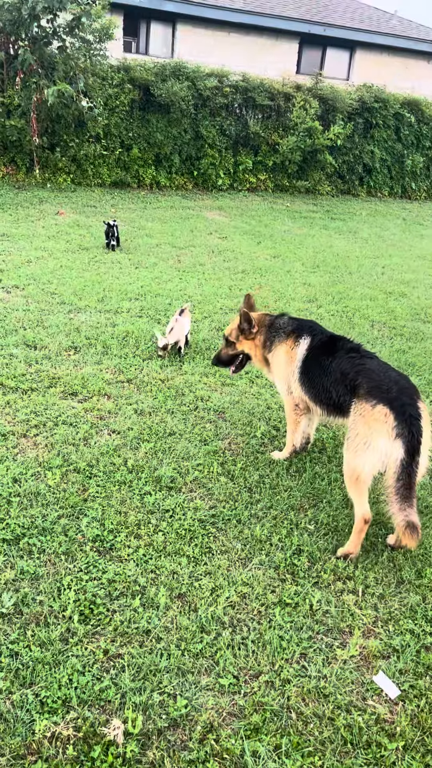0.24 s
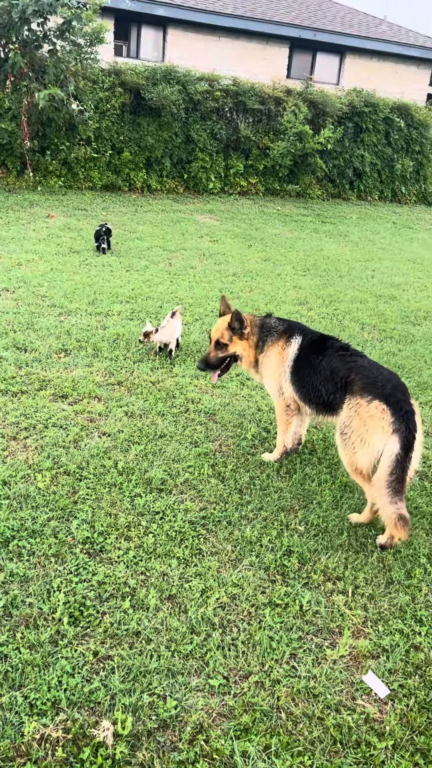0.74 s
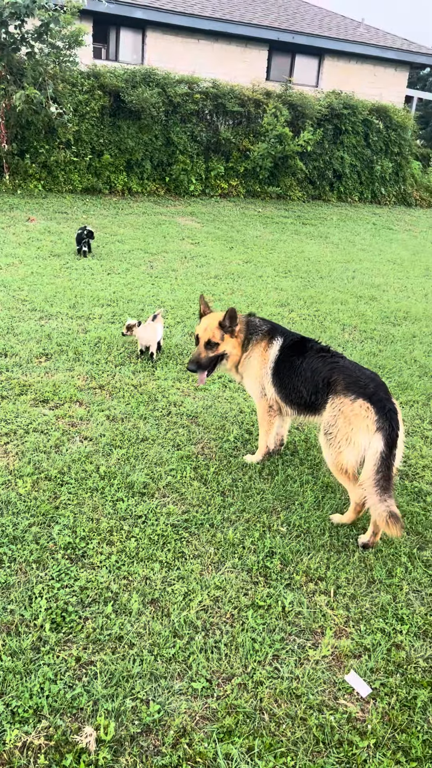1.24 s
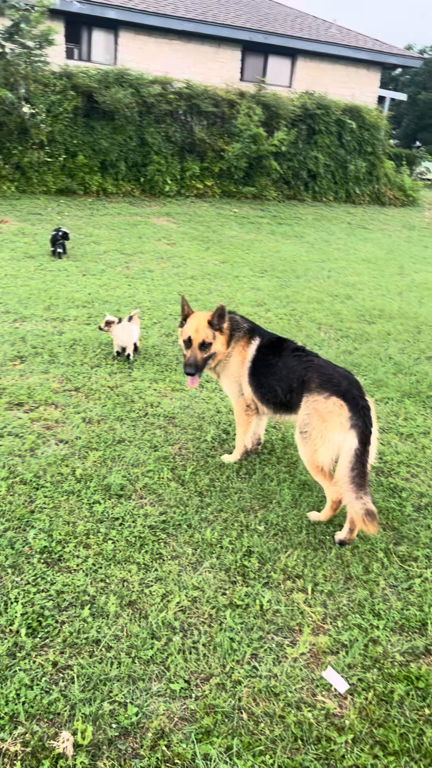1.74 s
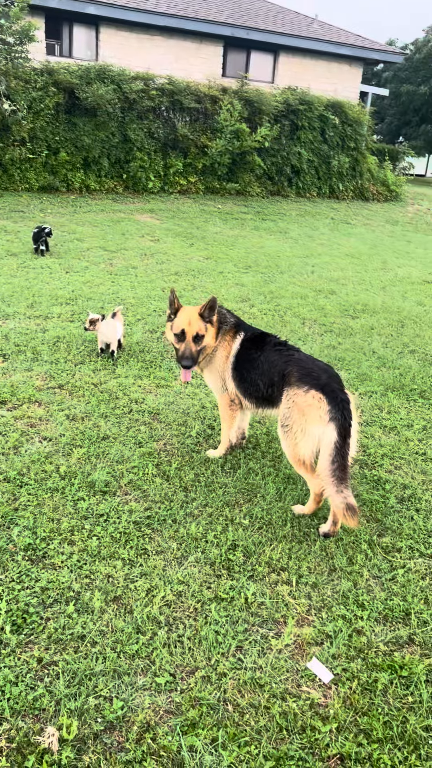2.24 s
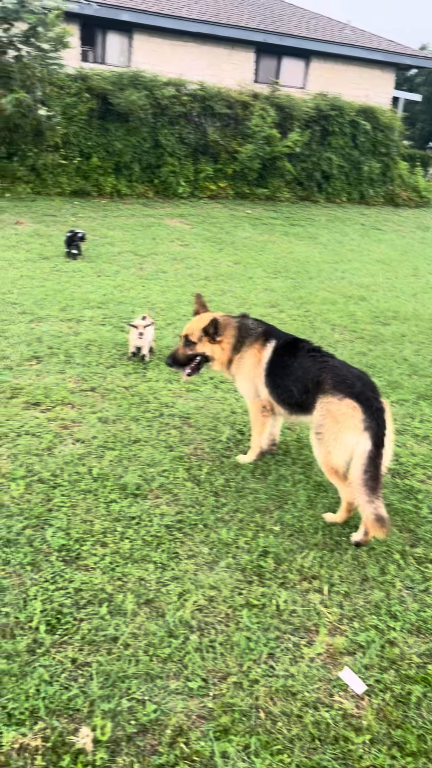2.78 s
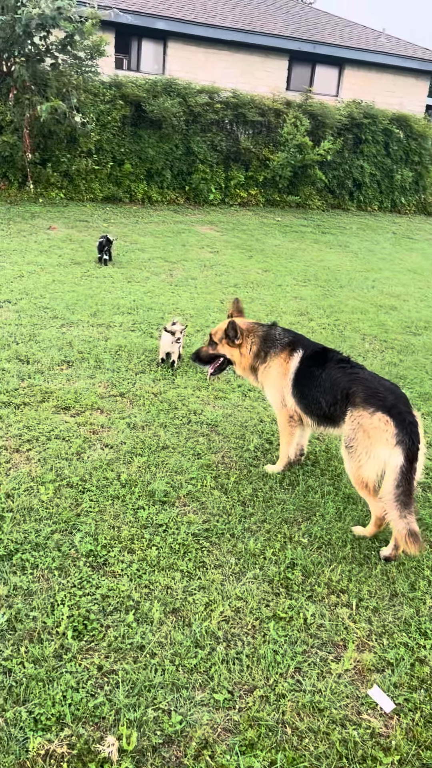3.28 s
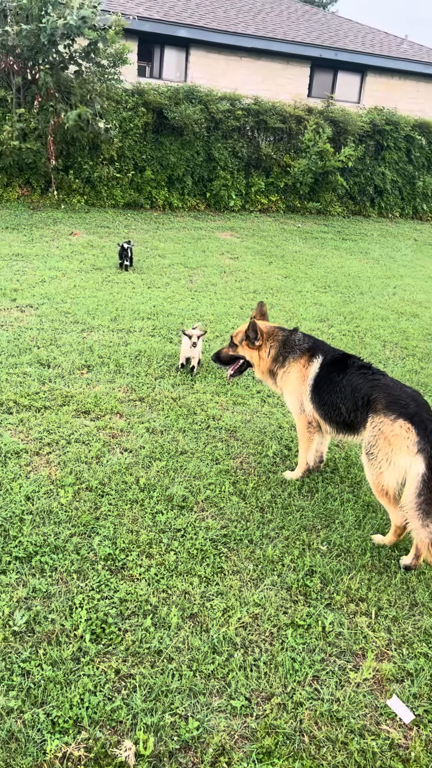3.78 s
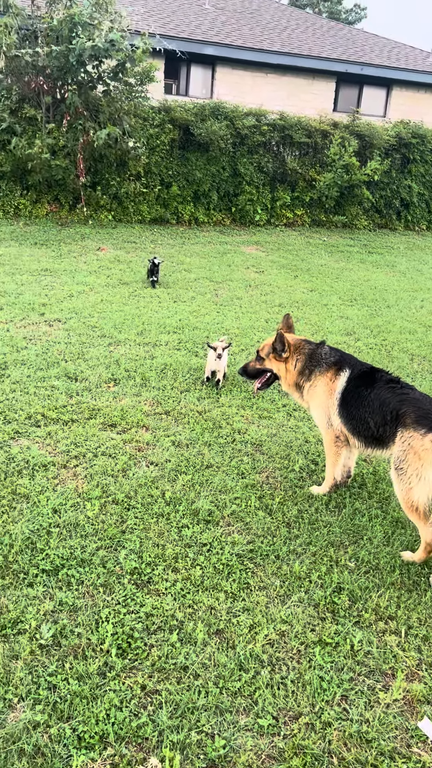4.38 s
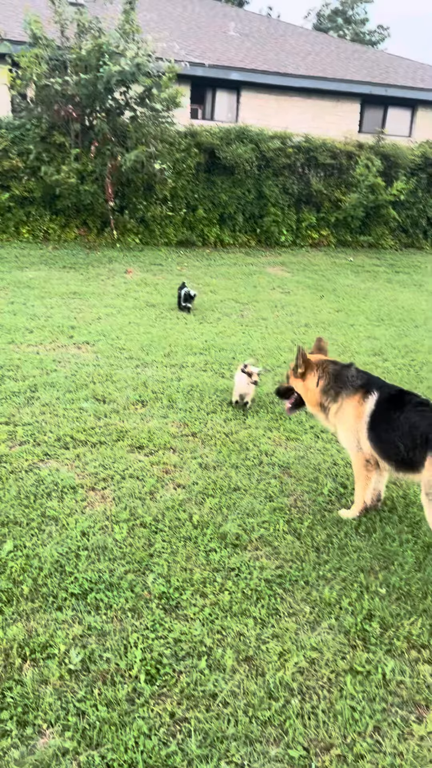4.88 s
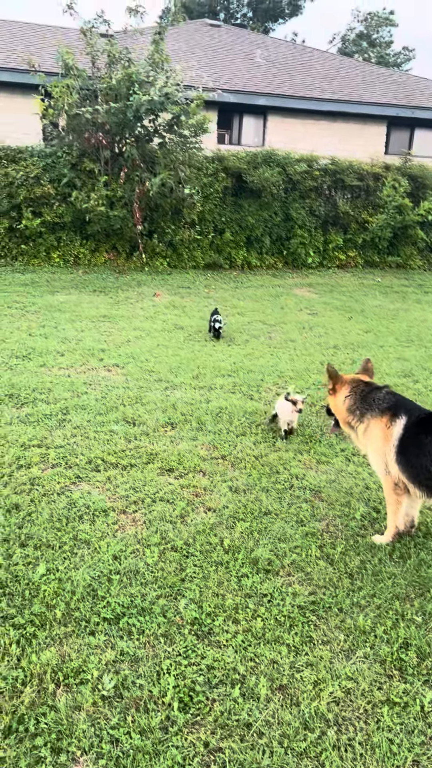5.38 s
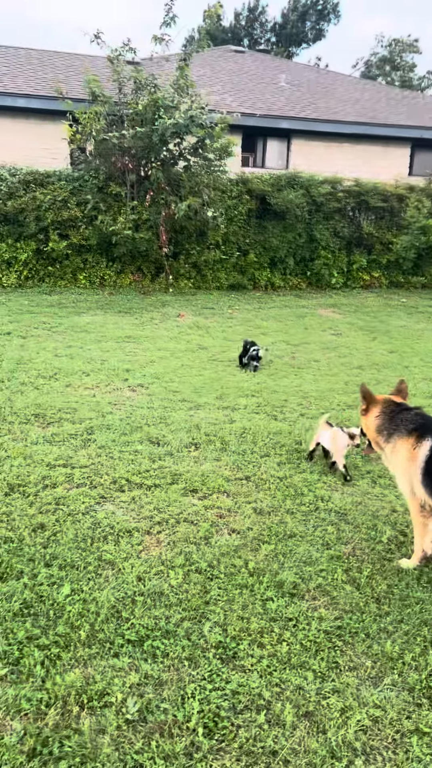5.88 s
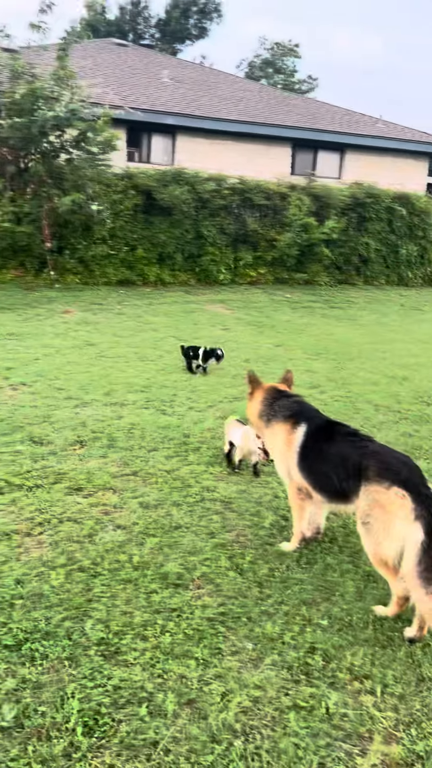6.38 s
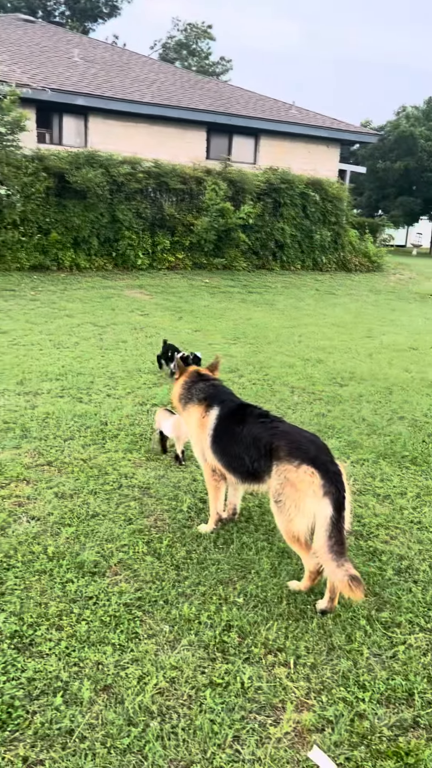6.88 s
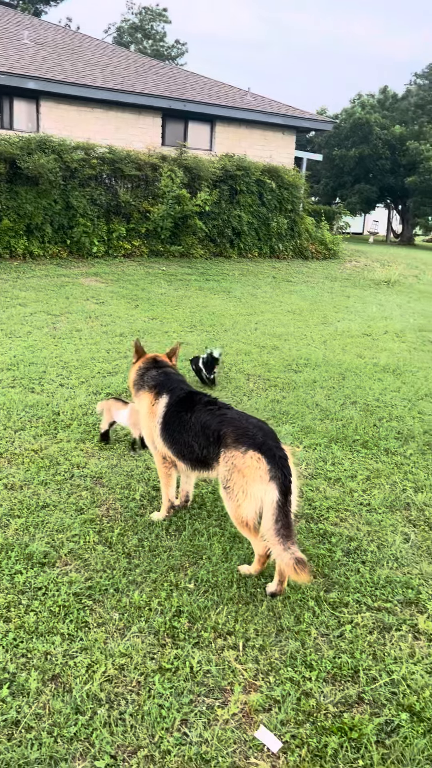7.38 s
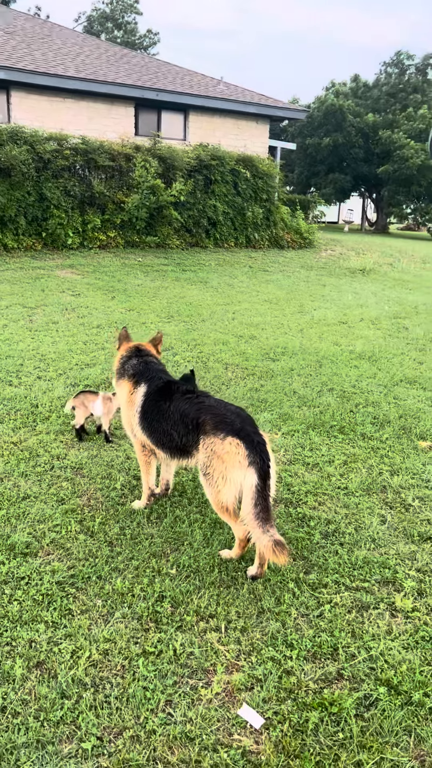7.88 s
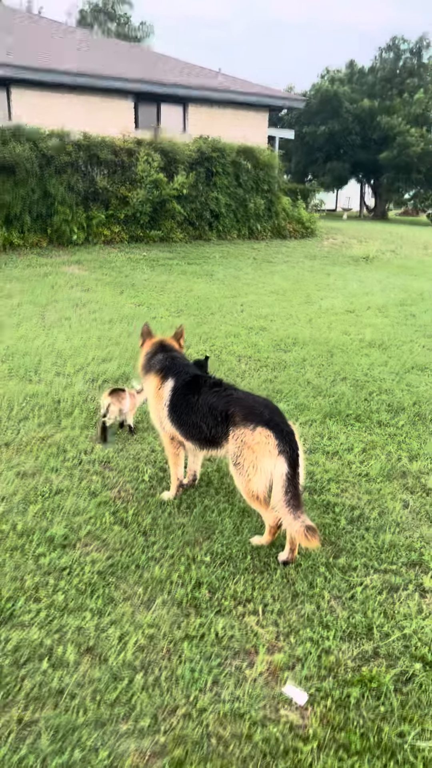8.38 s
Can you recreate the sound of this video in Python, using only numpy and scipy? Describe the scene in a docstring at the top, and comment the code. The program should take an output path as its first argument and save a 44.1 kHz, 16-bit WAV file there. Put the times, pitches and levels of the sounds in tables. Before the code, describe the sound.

Two young goats bleat in quick succession on a breezy lawn, then once more later, amid hedge birds' twittering and wind thumps on the microphone.

```python
"""On an open lawn before a house, a bush cricket rasps, a dog pants and sparrow-like birds buzz in a hedge.
Two young goats then bleat twice close together, once more later: strings of quavers, voiced through a throat.
Between and after the bleats the birds twitter and whistle with gliding near-sines; a thin high tone comes late.
Throughout, filtered noise hums as distant traffic, and light wind buffets the hand-held phone's microphone
with rumbling noise and falling thumps, the strongest near the end."""
import sys
import numpy as np
from scipy import signal
from scipy.fft import rfft, irfft, next_fast_len
from scipy.io import wavfile
from scipy.ndimage import uniform_filter1d

SR = 44100
rng = np.random.default_rng(int(sys.argv[2]) if len(sys.argv) > 2 else 0)


def dump_mix(stems):
    """Bounce the given channels to the path in sys.argv[1] as a 16-bit WAV at rate SR."""
    frames = np.atleast_2d(stems).T  # one column per channel
    limited = np.clip(frames, -1, 1)  # hard clip at full scale
    pcm = np.round(limited * 32767).astype(np.int16)
    wavfile.write(sys.argv[1], SR, pcm)


def decibels_to_gain(level_db):
    """Convert a level in decibels to a linear amplitude gain (20 dB per decade)."""
    exponent = np.asarray(level_db, float) / 20
    return 10 ** exponent


N = 380583
T = np.arange(N) / SR

# Quavers of each bleat: peak_pitch_s, length_s, pitch_hz, fall_hz, level_db
BLEATS = [
    [(2.19, 0.11, 660, 9.1, -73), (2.252, .073, 700, 80, -47.5), (2.338, .071, 695, 66, -44.5),
     (2.437, .073, 675, 71, -39), (2.541, 0.079, 690, 91, -42.5), (2.655, .055, 660, 64, -37.5)],
    [(2.524, .052, 725, 25, -34), (2.594, 0.063, 729, 62, -31), (2.68, .054, 730, 67.7, -31.5),
     (2.766, 0.062, 717.5, 86.5, -30.5), (2.868, .058, 693, 111, -33), (2.958, .054, 676, 104, -34.5),
     (3.059, 0.053, 646, 75.4, -37), (3.153, .046, 630, 70, -36), (3.255, .065, 591, 90, -44.5)],
    [(6.255, 0.081, 635, 10, -55.5), (6.31, 0.063, 700, 190, -44), (6.394, 0.074, 708, 140, -43.5),
     (6.484, .062, 685, 115, -40), (6.578, .051, 670, 97, -39.5), (6.676, 0.05, 660, 82, -35.5),
     (6.765, 0.037, 656, 64, -39), (6.862, 0.045, 619, 55, -44), (6.972, 0.053, 593, 55, -49),
     (7.063, .032, 628, 39, -43), (7.155, 0.023, 664, 110, -47.5)],
]
# Voice of each bleat: fall_curve (1 straight, 2 round), onset_pitch_lag (0-1), base_breath_db, leak_db, hiss_db
MANNERS = [(1.1, .06, -22, -22, -34), (1.7, .2, -19, -19, -19), (1.9, .2, -22, -22, -27)]
# Throat and mouth resonance of each bleat: frequency_hz, gain_db
THROATS = [
    [(350, -35.5), (600, -17), (1040, -30), (2020, 3.5), (2370, -16), (2790, -6), (4010, -20.5), (4710, -2),
     (5320, -8.5), (8070, -10), (9110, -14), (10600, -62), (15000, -45.5)],
    [(350, -47.5), (600, -23), (961, -33.5), (1360, -8.5), (2020, 0.5), (2500, -14), (3750, -8), (4060, -9),
     (4290, -1.5), (4970, -11.5), (5460, -6), (7860, -3), (9750, -24), (11300, -12.5), (15000, -33)],
    [(350, -55), (600, -25), (1180, -75), (1380, -12), (2130, 4), (2500, -16), (3700, -13.5), (4170, 1.5),
     (5320, -5.5), (6170, -7), (8180, -4.5), (9360, -12), (10200, -32), (15000, -36)],
]
# Share of a quaver before its highest pitch, each bleat: first_quaver (0-1), last_quaver (0-1)
BREATHS = [(0.191, .2), (.2, .58), (.5, .48)]
# Dulling over each bleat: first_treble_db, last_treble_db, bend (below 1 dulls early), extra_opening_db
DULLING = [(1.5, -11.5, 0.54, -6), (-0.5, -18.5, 1.83, -0.5), (5, -40, 0.86, -4.5)]

# Bird buzzes on which the shapes below act: start_s, length_s, first_hz, last_hz, level_db
BUZZ_HIGH = [(.42, 0.088, 4150, 3740, -70), (.845, 0.092, 4150, 4280, -48.5),
             (1.56, 0.098, 4000, 4110, -46), (3.625, .06, 3830, 4010, -59),
             (4.32, 0.066, 3750, 4030, -56.5)]
BUZZ_LOW = [(0, 0.06, 3170, 3290, -68), (.425, 0.088, 3195, 2910, -57), (.86, 0.086, 3170, 2800, -56.5),
            (1.59, 0.08, 2810, 2880, -60.5), (2.17, 0.058, 2660, 2570, -70), (3.52, 0.068, 2650, 2730, -70),
            (3.635, 0.065, 3290, 2840, -53.5), (4.33, 0.087, 2960, 2720, -52.5),
            (5.52, .045, 2880, 2810, -66), (3.84, 0.082, 3640, 3680, -79), (7.52, 0.084, 3050, 2880, -64),
            (7.72, 0.094, 3660, 3550, -65.5)]
BUZZ_ARC = [(1.02, 0.18, 3760, 2710, -46.5), (1.79, .18, 3710, 2540, -52), (3.72, .145, 3630, 2650, -62.5)]
# Course of a buzz: share_of_length (0-1), share_of_glide (first to last pitch), added_db
HIGH_SHAPE = [(0, 0.23, -29), (.15, 0.12, -5), (.35, 0.15, -2.5), (.9, 1, -17.5), (1, 1, -33)]
LOW_SHAPE = [(0, 0.64, -13), (.1, 0.39, -5), (.25, 0, 0), (.55, .3, 2.5), (.85, .9, 1.5), (1, 1.5, -14)]
ARC_SHAPE = [(0, 0.31, -11), (.1, .2, -3.5), (.28, 0, -2.5), (.5, .25, -5.5), (.76, .9, -1), (.9, 0.89, -3),
             (1, 1.14, -17)]
# Purer arcs of a second bird, one curve a note: time_s, pitch_hz, level_db
PURE_ARCS = [
    [(4.84, 4630, -63), (4.856, 4430, -48.5), (4.892, 4440, -44), (4.938, 3820, -53), (4.996, 3076, -45.5),
     (5.02, 3080, -68)],
    [(5.51, 4200, -70), (5.516, 4190, -56), (5.544, 4350, -48.5), (5.622, 3860, -45.5),
     (5.672, 2790, -51.5), (5.68, 2900, -77)],
    [(6.53, 4255, -68), (6.55, 4470, -47.5), (6.6, 4250, -45), (6.63, 3800, -61.5), (6.665, 2980, -48.5),
     (6.72, 2580, -68)],
]
# Steep falling notes and clear falling whistles: start_s, length_s, first_hz, last_hz, level_db
DIVES = [(7.108, .037, 4630, 2300, -43), (7.585, .047, 4890, 1876, -39)]
WHISTLES = [(5.092, .03, 3560, 2400, -56.5), (5.272, .03, 3700, 2400, -56), (5.72, .025, 2640, 1900, -63),
            (5.985, .04, 3030, 1300, -56.5), (7.145, 0.035, 2892, 2420, -47.5),
            (7.635, 0.039, 2700, 1896, -54.5), (8.332, .066, 3550, 1780, -50.5),
            (8.396, 0.037, 2880, 2170, -50), (8.502, .018, 2850, 2250, -50),
            (8.525, 0.067, 3010, 2050, -50)]
# Course of a dive or whistle: share_of_length (0-1), share_of_glide, added_db
DIVE_SHAPE = [(0, 0.045, -16), (.1, .06, -4), (.25, .3, -13.5), (.56, .63, 1), (.77, .85, -23),
              (1, 0.97, -11)]
WHISTLE_SHAPE = [(0, 0.085, -8.5), (.3, .45, -3), (.7, .85, -8), (1, 0.95, -9)]
# Twitter notes: centre_s, centre_hz, level_db, gaussian_spread_ms
TWITTER = [(3.34, 3160, -53, 3), (4.115, 3300, -64, 7.1), (4.152, 2480, -57.5, 3.4), (4.29, 3000, -65, 4.4),
           (4.31, 3000, -62, 4.9), (4.461, 3420, -58.5, 3.5), (4.471, 2600, -60, 3.6),
           (4.498, 2570, -54, 3.3), (4.623, 2420, -48, 3), (4.647, 2750, -44.5, 2.8),
           (4.67, 2830, -40.5, 5.2), (4.686, 3500, -51.5, 4.9), (4.702, 2920, -42.5, 4.4),
           (4.89, 2800, -58, 6.1), (4.916, 2560, -55.5, 5.3), (5.151, 3060, -49, 3.3),
           (5.163, 1985, -51, 4.2), (5.172, 2980, -45.5, 5.1), (5.182, 2900, -49, 3.3),
           (5.19, 1990, -54, 4), (5.194, 2650, -49, 3.7), (5.205, 2800, -53, 2.9), (5.212, 1980, -53, 3.1),
           (5.218, 2560, -53, 4.5), (5.228, 2400, -52, 3), (5.236, 1940, -50, 2.7), (5.245, 2400, -55, 4.4),
           (5.326, 2920, -49, 2.7), (5.342, 2700, -52, 5.5), (5.356, 2900, -49, 4), (5.362, 1810, -50, 3.9),
           (5.383, 2620, -42.5, 3.8), (5.413, 2750, -41.5, 5.6), (5.478, 2710, -57.5, 5.5),
           (5.76, 2350, -57, 4.4), (5.772, 2770, -53, 3.8), (5.782, 2800, -55, 3), (5.794, 2830, -47, 2.7),
           (5.804, 2900, -45, 2.4), (5.816, 2780, -42.5, 2), (5.827, 2800, -46, 2.8),
           (5.84, 2580, -51, 5.5), (5.852, 2260, -55, 2.8), (5.863, 2480, -49, 5), (5.874, 2700, -52, 2.8),
           (5.89, 2180, -56.5, 7.3), (6.028, 2530, -49.5, 4.6), (6.04, 2700, -59, 3), (6.056, 2520, -48, 7),
           (6.075, 2510, -57, 2.7), (6.154, 2800, -59, 4.4), (6.175, 2820, -56, 5.4),
           (6.186, 2840, -51, 2.1), (6.201, 2590, -43, 3.2), (6.225, 2770, -43, 5.3), (6.36, 2700, -49, 3),
           (6.385, 2900, -45, 5), (6.413, 2840, -41, 4.6), (6.837, 2900, -53, 4.8), (6.863, 2580, -43, 4),
           (6.884, 2480, -50.5, 5.2), (6.9, 2570, -53, 2.7), (6.92, 2300, -55, 3), (7.355, 1890, -58, 4.3),
           (7.375, 2500, -58, 7.3), (7.397, 2800, -48.5, 6.6), (7.422, 3020, -47, 5.7),
           (7.801, 1810, -57, 5.6), (7.819, 2730, -48.5, 5), (7.844, 2800, -42.5, 4.6),
           (7.867, 2930, -44.5, 2.9), (8.04, 2800, -56, 4.4), (8.052, 2760, -54, 4.1),
           (8.066, 2870, -45, 1.5), (8.09, 2870, -43.5, 3.2), (8.116, 2890, -45.5, 3.5)]
# A very high thin wavering tone: time_s, pitch_hz, level_db
THIN_TONE = [
    [(7.24, 10000, -85), (7.3, 10640, -72.5), (7.46, 10400, -75), (7.55, 11100, -75), (7.6, 12200, -79),
     (7.66, 10700, -76), (7.7, 9850, -88), (7.775, 8500, -74)],
]

# Low distant calls: start_s, length_s, first_hz, last_hz, level_db
FAR_CALLS = [(1, 0.077, 527, 456, -59), (5.98, 0.117, 609, 491, -59.5)]
# Course of a distant call: share_of_length (0-1), share_of_glide, added_db
FAR_SHAPE = [(0, 0.81, -1), (.3, 0.12, -2), (.7, 0.36, 1.5), (1, 1, -11)]
# Open mouth of the panting dog: frequency_hz, gain_db
PANT_MOUTH = [(700, -35), (1300, 5.5), (1700, 0), (2100, -0.5), (2600, -20), (5000, -11.5), (8000, -34.5)]
# Steady cricket rasp: time_s, level_db
RASP = [(0, -71), (1.44, -69), (1.75, -72), (2.3, -72), (2.55, -76.5)]
# Louder cricket wing strokes: start_s, level_db
STROKES = [(0.0298, -57), (0.0857, -56), (0.1321, -59), (0.163, -57.5), (0.2084, -56), (0.2768, -54.5),
           (0.8669, -71.5), (0.9283, -66.5), (1.1643, -62), (1.2361, -56.5), (1.3194, -57.5), (1.3688, -56),
           (1.4262, -57), (1.504, -57.5), (1.5648, -54.5), (1.6277, -59.5)]

# Spectrum of the distant background: frequency_hz, relative_db
YARD = [(88, -17.5), (150, -19.5), (353, -4), (472, 0.5), (709, -0.5), (1450, -7), (1870, -11), (2760, -13),
        (4850, -14.5), (5450, -24), (8190, -30), (9950, -34.5), (15600, -27.5)]
# Width of the background: frequency_hz, side_minus_mid_db
YARD_SIDE = [(150, 13), (500, 0.5), (1500, -1.5), (5000, -3), (15000, -0.5)]
# Faint treble hiss that rises and fades: centre_s, half_length_s, level_db
HISS_RISES = [(0.852, 0.36, -73.5), (1.607, 0.037, -65.5), (2.038, 0.65, -77.5), (5.35, 0.4, -77),
              (7.39, 0.36, -76), (7.65, 0.12, -72), (8.56, 0.14, -66.5)]
# Slowly varying breeze on the microphone: time_s, rumble_drive_db
BREEZE = [(0, -45), (.6, -60.5), (1.3, -55.5), (2.2, -57.5), (3.5, -52.5), (4.7, -58.5), (5.0, -46.5),
          (5.3, -57.5), (5.9, -59), (6.9, -56.5), (7.0, -52), (7.4, -55), (7.85, -47), (8.63, -55)]
# Gusts: centre_s, half_length_s, rumble_drive_db, flutter_drive_db
GUSTS = [(0, 0.014, -28.5, -47), (0.13, 0.013, -43, -73), (0.418, 0.032, -40, -45),
         (0.518, 0.015, -45, -77), (1.157, 0.022, -49, -60.5), (1.677, 0.024, -51, -69),
         (2.16, 0.018, -46, -86), (2.452, 0.013, -32, -41), (2.515, 0.084, -52, -87),
         (2.758, 0.051, -45.5, -70), (2.94, 0.043, -41.5, -55), (3.225, 0.035, -41.5, -81),
         (3.8, 0.029, -44, -43), (4.085, 0.045, -36.5, -43), (4.204, .02, -32, -43),
         (4.313, 0.042, -38, -62), (4.431, 0.031, -36.5, -31.5), (4.48, 0.013, -33.5, -42),
         (4.595, 0.032, -33, -60), (4.9, 0.042, -60, -75), (5.109, 0.051, -51, -48),
         (5.178, 0.021, -45, -66), (5.33, 0.022, -50, -69), (5.863, 0.011, -54, -73),
         (6.367, 0.028, -50, -69), (6.498, 0.069, -56, -58), (6.99, 0.043, -55.5, -68),
         (7.95, .02, -35.5, -52), (8.09, 0.031, -27.5, -33), (8.173, 0.035, -27.5, -27.5),
         (8.222, 0.013, -25.5, -17), (8.402, 0.072, -47, -58), (8.474, 0.034, -57, -60)]
# Single buffets: start_s, drive_db, final_hz
BUFFETS = [(0.115, -40, 77), (0.388, -33, 86), (1.16, -41, 67), (2.093, -38, 51), (2.428, -31, 75),
           (2.766, -42, 75), (2.903, -36.5, 140), (2.998, -36.5, 76.6), (3.179, -31.5, 76.7),
           (3.622, -40, 93), (3.786, -30.5, 58), (4.075, -32.5, 73.8), (4.186, -29.5, 72),
           (4.295, -34, 86.7), (4.401, -31.5, 89), (4.572, -34, 82.4), (5.113, -26.5, 72),
           (5.849, -49.5, 102), (6.369, -44.5, 97), (7.551, -44.5, 83.5), (7.933, -34.5, 119),
           (8.073, -19.5, 92), (8.146, -14.5, 90.5), (8.365, -38, 112.7)]
# Further sharp slaps of air, some together with a buffet: start_s, drive_db, base_hz (settling at 2.65 times this)
SLAPS = [(5.09, -33, 71), (5.114, -24, 67.6), (4.43, -33, 90), (8.069, -31, 57.6), (8.143, -33.5, 90),
         (8.172, -29.5, 96), (8.213, -35.5, 141), (8.365, -43, 114), (8.435, -47, 90)]


def read(rows):
    """Columns of a curve, one value per sample."""
    s, *columns = np.transpose(rows)
    return [np.interp(T, s, c) for c in columns]


def band(lo_hz, hi_hz, order=2):
    """Noise of rms 1 in a band."""
    sos = signal.butter(order, [lo_hz, min(hi_hz, .45 * SR)], "bandpass", fs=SR, output="sos")
    x = signal.sosfilt(sos, rng.standard_normal(N))
    return x / x.std()


def walk(rate_hz):
    """Smooth random wander of spread 1."""
    k = int(SR / rate_hz)
    x = np.repeat(rng.standard_normal(N // k + 1), k)
    x = uniform_filter1d(uniform_filter1d(x, k), k)[:N]
    return x / x.std()


def colour(x, points):
    """Filter by (Hz, dB) points, joined along a logarithmic frequency axis."""
    hz, db = np.transpose(points)
    size = next_fast_len(N)
    f = np.maximum(np.fft.rfftfreq(size, 1 / SR), 1)
    gain = decibels_to_gain(np.interp(np.log(f), np.log(hz), db))
    return irfft(rfft(x, size) * gain, size)[..., :N]


def quarter_turn(x):
    """The same spectrum with every phase turned by 90 degrees."""
    return np.imag(signal.hilbert(x, next_fast_len(N)))[:N]


def hump(s, half_s):
    """A smooth rise and fall around s."""
    return np.exp(-((T - s) / half_s) ** 2)


def pushes(quavers, breath, dulling):
    """As the breath runs out, the place of the pitch peak shifts and the quavers grow duller."""
    first, last = breath
    first_db, last_db, bend, opening_db = dulling
    s, length, hz, fall_hz, db = np.transpose(quavers)
    spent = (s - s[0]) / (s[-1] - s[0])
    lead = length * (first + spent * (last - first))
    treble_db = first_db + spent ** bend * (last_db - first_db) + opening_db * (spent == 0)
    return np.transpose([s, lead, length - lead, hz, fall_hz, db, treble_db])


def bleat(quavers, manner, throat):
    """Each push of the belly starts the folds; pitch arches up and sags, air leaks between pushes."""
    curve, lag, breath_db, leak_db, hiss_db = manner
    points_hz, points_db = np.transpose(throat)
    air = colour(rng.standard_normal(N), throat)
    air = air / air.std()
    jitter, shimmer = walk(300), walk(60)
    out, blow = np.zeros(N), np.zeros(N)
    loudest_db = max(q[5] for q in quavers)
    for s, lead, run, hz, fall_hz, db, treble_db in quavers:
        span = slice(int((s - lead) * SR), int((s + run) * SR))
        dt = T[span] - s
        before, after = np.maximum(-dt, 0) / lead, np.maximum(dt, 0) / run
        pitch = hz * (1 - lag * before ** 1.6) - fall_hz * after ** curve
        # the folds slacken further as the push dies
        pitch = pitch - .06 * hz * after ** 5
        pitch = pitch * (1 + .003 * jitter[span])
        phase = 2 * np.pi * np.cumsum(pitch) / SR
        # the push swells slowly and is cut off quickly
        part = np.linspace(0, 1, len(dt))
        effort = decibels_to_gain(db) * np.sin(np.pi * part ** 1.4)
        # weak pushes are breathier
        push_breath_db = breath_db + .4 * treble_db + .85 * (loudest_db - db)
        voice = decibels_to_gain(push_breath_db) * air[span] * (1 + .7 * np.cos(phase))
        # the mouth takes a slightly different shape for each push
        shape = rng.standard_normal(22)
        for k in range(1, 22):
            overtone_hz = k * pitch
            gain_db = np.interp(np.log(overtone_hz), np.log(points_hz), points_db)
            gain_db = gain_db + treble_db * np.clip((overtone_hz - 2200) / 2500, 0, 1)
            gain_db = gain_db + 1.5 * np.roll(shimmer, k * 9000)[span] + 1.9 * shape[k]
            voice = voice + decibels_to_gain(gain_db) * np.cos(k * phase + .03 * k ** 2)
        out[span] += voice * effort
        blow[span] = np.sin(np.pi * part)
    s, db, treble_db = np.transpose(quavers)[[0, 5, 6]]
    level_db = np.interp(T, s, db)
    # the dulling also slightly rebalances the leaking air
    low = colour(air, [(2200, 16), (3500, -20.0)])
    air = low + (air - low) * decibels_to_gain(0.067 * np.interp(T, s, treble_db))
    leak = air * decibels_to_gain(level_db + leak_db + 2 * shimmer)
    hiss = decibels_to_gain(uniform_filter1d(level_db, 9000) + hiss_db) * band(6400, 8800)
    hiss = hiss * (0.96 + 0.3 * uniform_filter1d(blow, 700))
    open_mouth = np.clip(np.minimum(T - s[0] + 0.021, s[-1] + 0.043 - T) / 0.0058, 0, 1)
    return out + (leak + hiss) * open_mouth


def goats():
    """Both young goats: three bleats, each with its own breath, manner and throat."""
    out = np.zeros(N)
    for quavers, breath, dulling, manner, throat in zip(BLEATS, BREATHS, DULLING, MANNERS, THROATS):
        out += bleat(pushes(quavers, breath, dulling), manner, throat)
    return out


def shaped(notes, shape):
    """Pitch and level curves of notes that share one shape."""
    return [[(s + np.clip(part, 0, 1) * length, first_hz + glide * (last_hz - first_hz), db + step_db)
             for part, glide, step_db in shape]
            for s, length, first_hz, last_hz, db in notes]


def song(notes, trill_hz, swing_hz, depth, octave_db, scoop_hz=0):
    """Near-sine notes along pitch curves; a trill shakes pitch and level, a scoop starts them low."""
    out, wobble, flicker = np.zeros(N), walk(80), walk(250)
    for rows in notes:
        s, hz, db = np.transpose(rows)
        span = slice(int(s[0] * SR), int(s[-1] * SR))
        t = T[span]
        curve_hz = np.interp(t, s, hz)
        trill = 2 * np.pi * np.cumsum(trill_hz * (1 + 0.137 * wobble[span])) / SR + 6 * rng.random()
        pitch = curve_hz + swing_hz * np.sin(trill) - scoop_hz * np.exp((s[0] - t) / .01)
        phase = 2 * np.pi * np.cumsum(pitch) / SR
        edge = np.clip(np.minimum(t - s[0], s[-1] - t) / 0.00046, 0, 1)
        # the overtone sounds near the top of notes that peak above 3500 or below 1000 Hz
        has_overtone = hz.max() > 3500 or hz.max() < 1000
        beak = np.clip((curve_hz / hz.max() - .8) / .2, 0, 1) * has_overtone
        tone = np.sin(phase) + decibels_to_gain(octave_db) * beak * np.sin(2 * phase)
        level = np.sqrt(2) * decibels_to_gain(np.interp(t, s, db) + 1.46 * flicker[span])
        out[span] += level * edge * (1 - depth * np.cos(trill)) * tone
    return out


def twitter():
    """Very short falling notes that flatten towards their end, each with a lower answer."""
    out = np.zeros(N)
    ms = np.arange(-900, 900) / SR * 1000
    for s, hz, db, spread_ms in TWITTER:
        start_turn = rng.random()
        fall_hz_per_ms = 220 / spread_ms * np.exp(.2 * rng.standard_normal())
        pitch = np.minimum(hz * np.exp(-fall_hz_per_ms * ms / hz), 9000)
        note = np.exp(-(ms / spread_ms) ** 2 / 2) * np.sin(2 * np.pi * (np.cumsum(pitch) / SR + start_turn))
        out[int(s * SR) - 900:][:len(ms)] += decibels_to_gain(db) * note
        # the other half of the syrinx answers lower, 9 ms later
        answer = np.exp(-(ms / 5.2) ** 2 / 2) * np.sin(2 * np.pi * np.cumsum(.68 * pitch) / SR)
        out[int((s + .009) * SR) - 900:][:len(ms)] += decibels_to_gain(db - 15.5) * answer
    return out


def birds():
    """Hedge birds: fast deep trills make the buzzes, slower shallow ones the dives and whistles."""
    buzzes = shaped(BUZZ_HIGH, HIGH_SHAPE) + shaped(BUZZ_LOW, LOW_SHAPE) + shaped(BUZZ_ARC, ARC_SHAPE)
    buzz = song(buzzes, trill_hz=136.2, swing_hz=210, depth=0.5, octave_db=-18, scoop_hz=700)
    # a second bird with a purer, narrower buzz
    pure = song(PURE_ARCS, trill_hz=140, swing_hz=165, depth=0.44, octave_db=-37, scoop_hz=480)
    falls = shaped(DIVES, DIVE_SHAPE) + shaped(WHISTLES, WHISTLE_SHAPE)
    whistles = song(falls, trill_hz=90, swing_hz=40, depth=0.11, octave_db=-20)
    return buzz + pure + whistles + twitter()


def thin_tone():
    """A very high thin wavering tone: a faint near-sine whose pitch and level shake."""
    return song(THIN_TONE, trill_hz=43.7, swing_hz=130, depth=0.37, octave_db=-60)


def echoes(x, t60_s, db):
    """House wall and hedge scatter a short diffuse tail, different on each side."""
    t = np.arange(12000) / SR
    decay = np.exp(-np.log(1000) * t / t60_s) * np.clip(t / 0.0013, 0, 1)
    tail = rng.standard_normal((2, len(t))) * decay
    tail = tail / np.sqrt((tail ** 2).sum(axis=1, keepdims=True))
    return decibels_to_gain(db) * signal.fftconvolve(x[None], tail, axes=1)[:, :N]


def dog():
    """Faint quick panting: puffs of air through an open mouth."""
    first_s, puffs_per_s, count = .725, 7.2, 11
    air = colour(rng.standard_normal(N), PANT_MOUTH)
    puff_db = np.linspace(-69.5, -63, count) + 2.5 * rng.standard_normal(count)
    puffs = np.zeros(N)
    for k, db in enumerate(puff_db):
        puffs += decibels_to_gain(db) * np.exp(-((T - first_s - k / puffs_per_s) / 0.041) ** 4)
    return air / air.std() * puffs


def eddies(hz, spread, rate_hz):
    """Pressure that swings at an erratically wandering pace."""
    return np.sqrt(2) * np.sin(2 * np.pi * np.cumsum(hz * np.exp(spread * walk(rate_hz))) / SR)


def cricket():
    """A very high noise-band rasp with louder strokes of the wing, shaken by an uneven flutter."""
    strokes = np.zeros(N)
    for s, db in STROKES:
        strokes += decibels_to_gain(db) * (T > s) * np.exp(-(np.abs(T - s) / .022) ** 3)
    fade = np.clip((RASP[-1][0] - T) / .05, 0, 1)
    teeth = 1 + .5 * eddies(200, .2, 30)
    sides = []
    for _ in range(2):
        rasp = decibels_to_gain(read(RASP)[0] + 1.5 * walk(20)) * fade * band(14030, 15800, order=3)
        sides.append((rasp + strokes * band(14060, 20000, order=3)) * teeth)
    return np.array(sides)


def far_calls():
    """Low distant calls: soft near-sines with a slow shallow trill."""
    return song(shaped(FAR_CALLS, FAR_SHAPE), trill_hz=30, swing_hz=16, depth=0.13, octave_db=-8)


def yard():
    """A smooth broad background floor, with a separate faint treble hiss that rises and fades."""
    mid = colour(rng.standard_normal(N), YARD)
    side = colour(colour(rng.standard_normal(N), YARD), YARD_SIDE) / mid.std()
    mid = mid / mid.std() * decibels_to_gain(walk(4.2))
    hiss_level = decibels_to_gain(-85.5) + sum(decibels_to_gain(db) * hump(s, half) for s, half, db in HISS_RISES)
    hiss = hiss_level * np.array([band(3300, 10000) for _ in range(2)])
    return decibels_to_gain(-63.5) * np.array([mid + side, mid - side]) + hiss


def wind():
    """Gusts rumble on both microphone ports nearly alike; single eddies burst as short falling thumps."""
    push = decibels_to_gain(read(BREEZE)[0]) + sum(decibels_to_gain(db) * hump(s, half) for s, half, db, _ in GUSTS)
    shake = decibels_to_gain(-57.5) + sum(decibels_to_gain(db) * hump(s, half) for s, half, _, db in GUSTS)
    rumble = push * decibels_to_gain(1.26 * walk(25)) * (0.49 * eddies(75, 0.32, 40) + 0.5 * band(28, 104))
    flutter = shake * decibels_to_gain(3 * walk(30)) * (0.18 * eddies(205, 0.28, 60) + 0.2 * band(170, 387, order=3))
    mid = rumble + flutter
    t = np.arange(5000) / SR

    def swing(hz):
        """A sine of random start whose pitch falls towards hz."""
        return np.sin(2 * np.pi * (np.cumsum(hz * (1 + 1.263 * np.exp(-t / 0.011))) / SR + rng.random()))

    def slap(hz):
        """A higher, shorter burst of the same falling kind."""
        return swing(2.65 * hz) * (t / 0.0052) * np.exp(1 - t / 0.002)

    bursts = []
    for s, db, hz in BUFFETS:
        thump = swing(hz) * (t / 0.019) * np.exp(1 - t / 0.011)
        bursts.append((s, decibels_to_gain(db) * (thump + decibels_to_gain(-32) * slap(hz))))
    for s, db, hz in SLAPS:
        bursts.append((s, decibels_to_gain(db) * slap(hz)))
    for s, burst in bursts:
        part = mid[int(s * SR):][:len(t)]
        part += burst[:len(part)]
    side = push * decibels_to_gain(-23.5) * band(45, 200) + decibels_to_gain(-14.5) * quarter_turn(mid)
    return np.array([mid + side, mid - side])


def scene():
    """Goats, birds and thin tone with echoes, over dog, cricket, far calls, yard and wind."""
    goat = goats()
    # the ports sit apart, so the treble of the goats is out of step between them
    apart = colour(quarter_turn(goat), [(1500, -20.5), (3000, -23.0), (5000, -13.0), (8000, -1), (15000, -3)])
    lawn = goat + np.array([apart, -apart]) + echoes(goat, t60_s=0.48, db=-12.0)
    high = birds() + thin_tone()
    high = high * decibels_to_gain(np.array([[.3], [-.3]])) + echoes(high, t60_s=.3, db=-8.5)
    return lawn + high + dog() + cricket() + far_calls() + yard() + wind()


def band_limit(x):
    """A steep low-pass at the top of the band."""
    return signal.sosfilt(signal.butter(12, 15700, fs=SR, output="sos"), x)


def record(dry):
    """The hand-held phone cuts the deepest bass, below 40 Hz."""
    mix = signal.sosfilt(signal.butter(4, 40, "highpass", fs=SR, output="sos"), dry)
    return band_limit(mix)


dry = scene()
out = record(dry)
dump_mix(out)
```